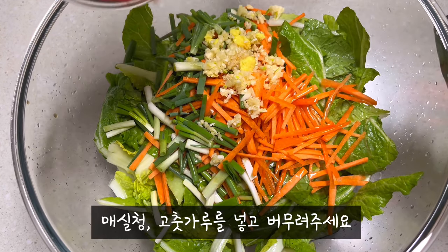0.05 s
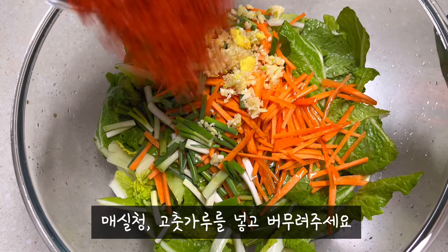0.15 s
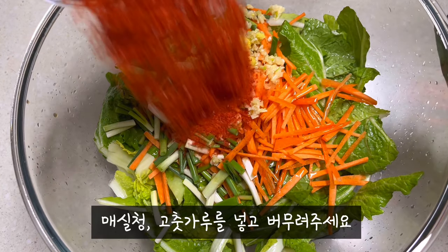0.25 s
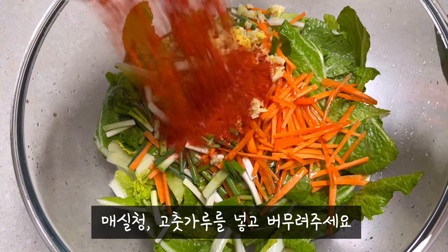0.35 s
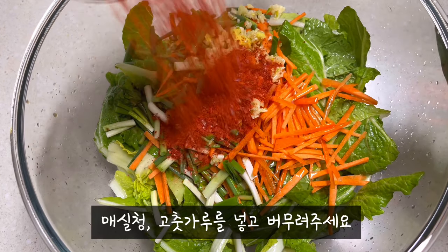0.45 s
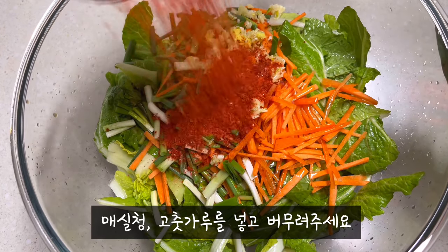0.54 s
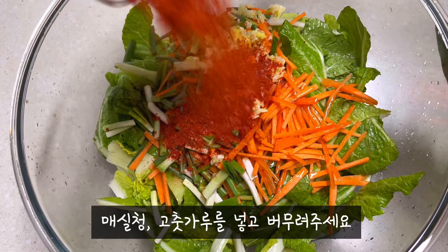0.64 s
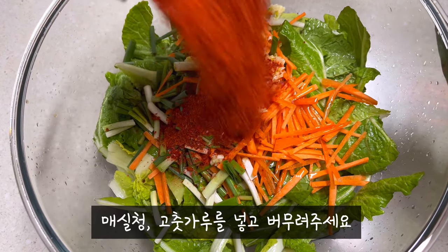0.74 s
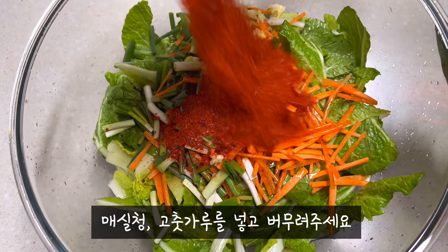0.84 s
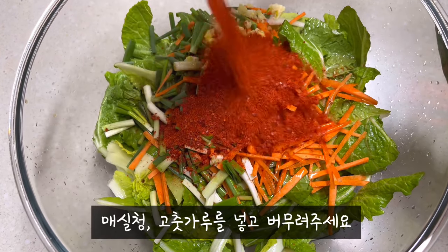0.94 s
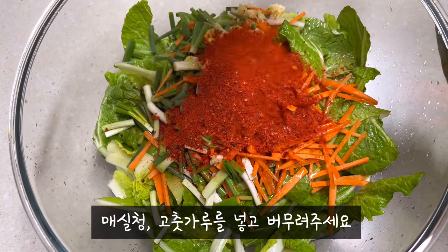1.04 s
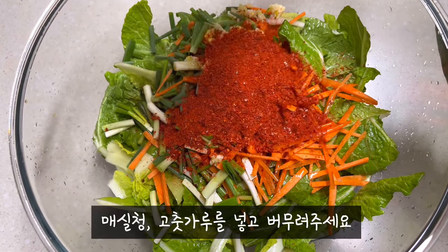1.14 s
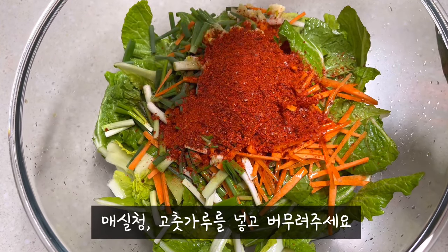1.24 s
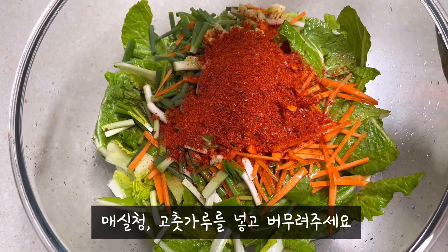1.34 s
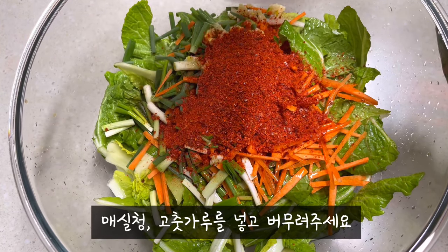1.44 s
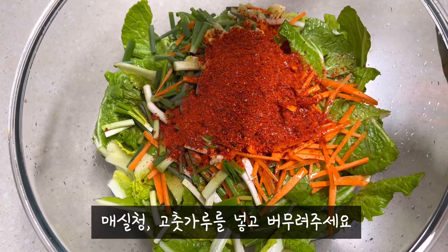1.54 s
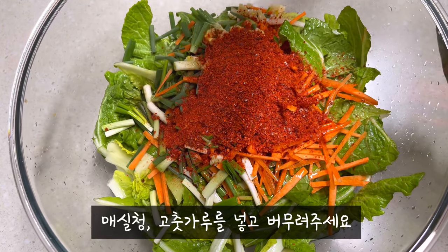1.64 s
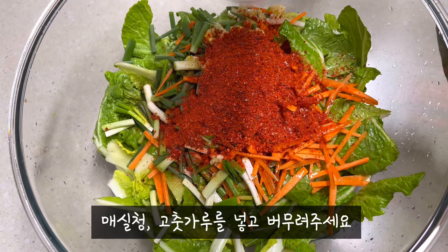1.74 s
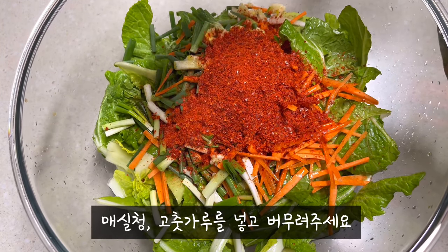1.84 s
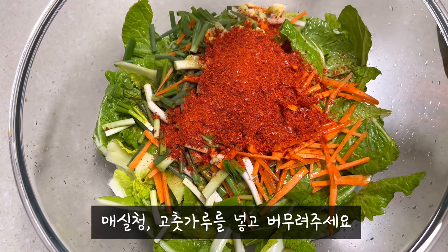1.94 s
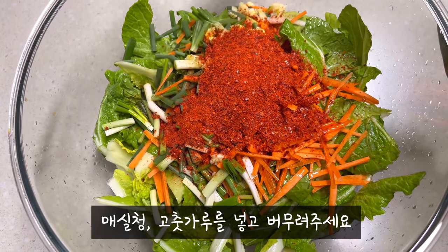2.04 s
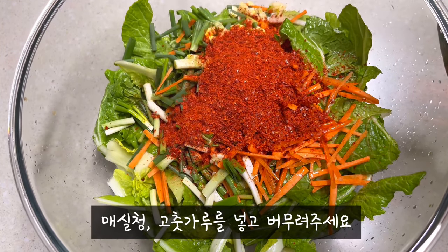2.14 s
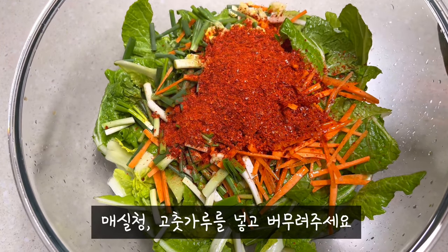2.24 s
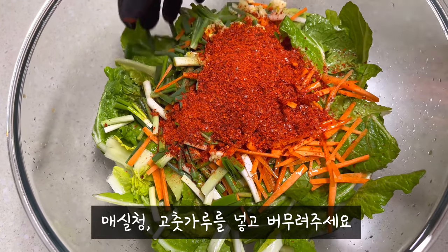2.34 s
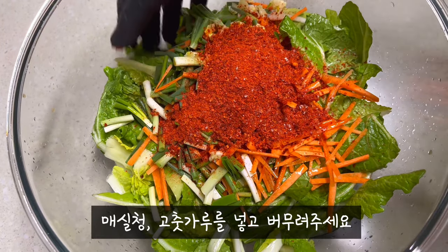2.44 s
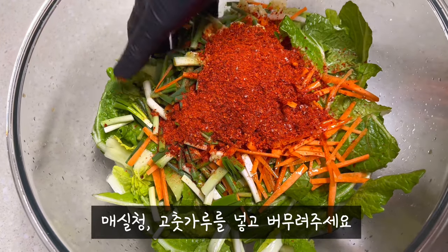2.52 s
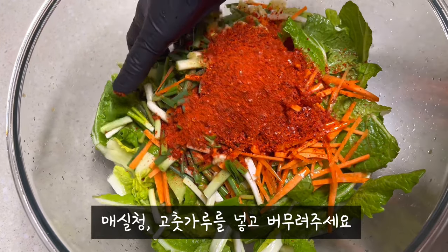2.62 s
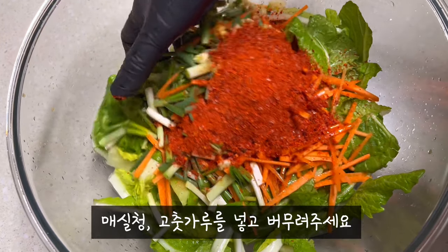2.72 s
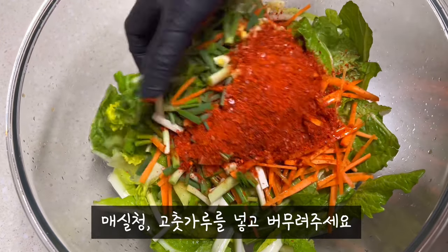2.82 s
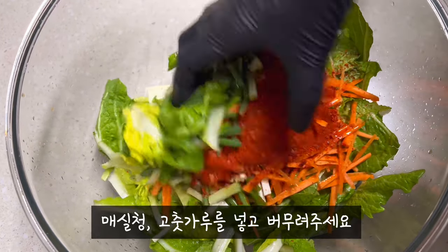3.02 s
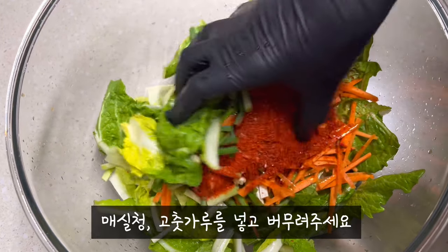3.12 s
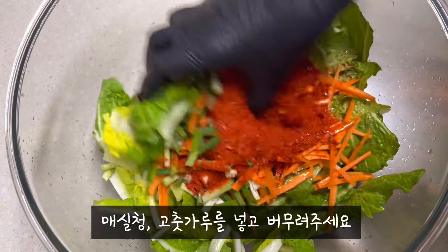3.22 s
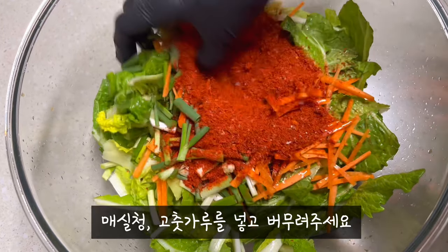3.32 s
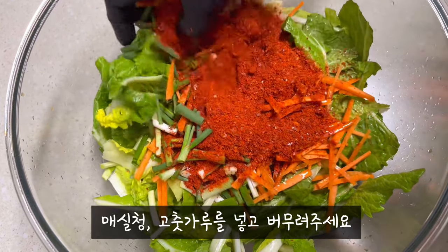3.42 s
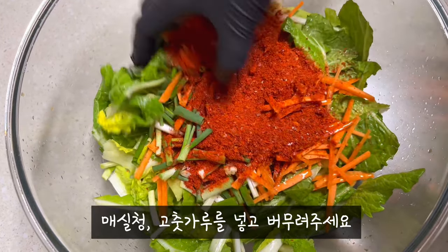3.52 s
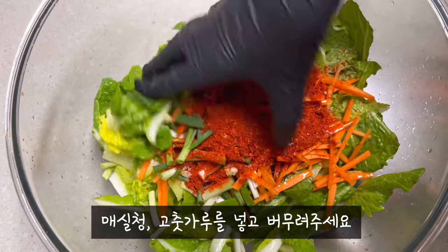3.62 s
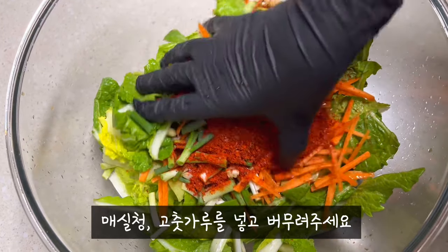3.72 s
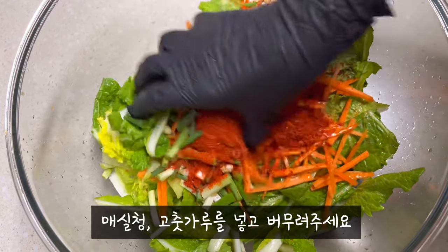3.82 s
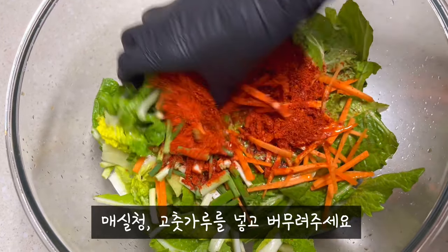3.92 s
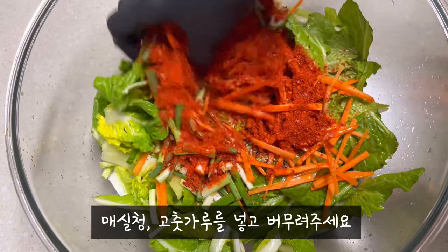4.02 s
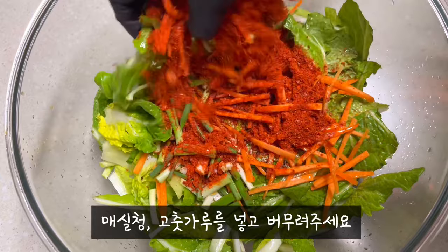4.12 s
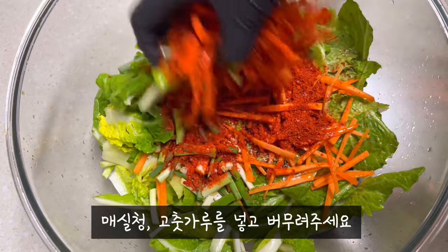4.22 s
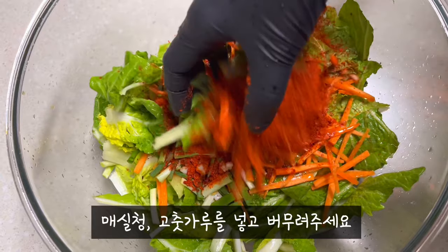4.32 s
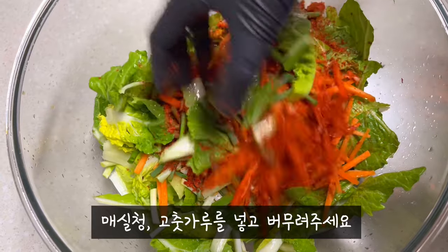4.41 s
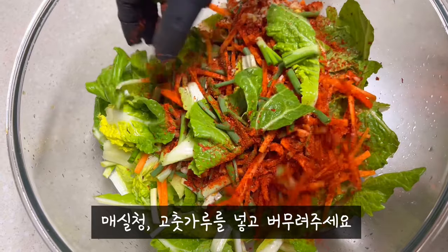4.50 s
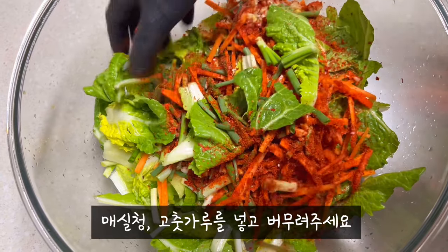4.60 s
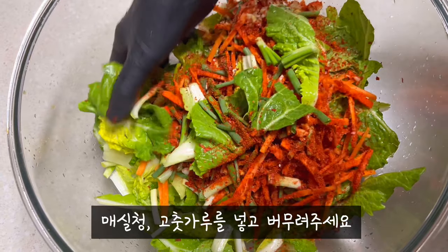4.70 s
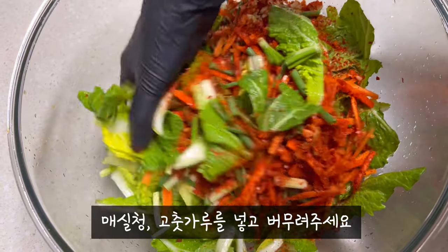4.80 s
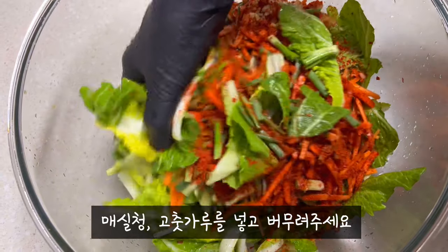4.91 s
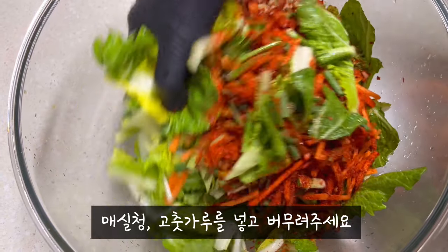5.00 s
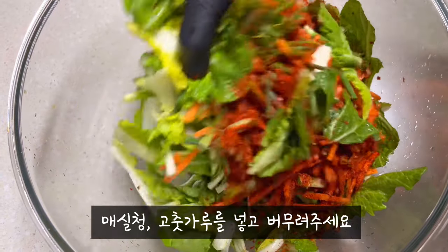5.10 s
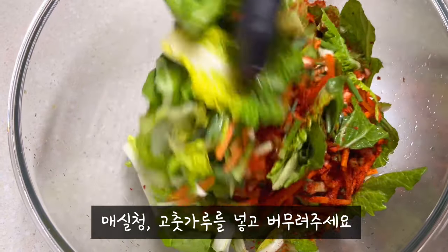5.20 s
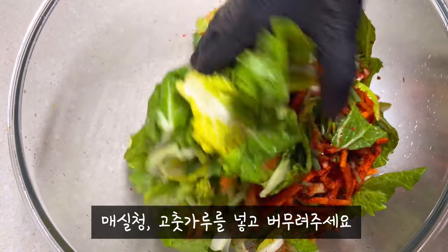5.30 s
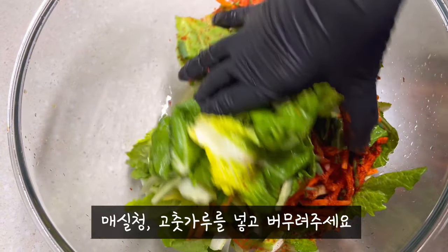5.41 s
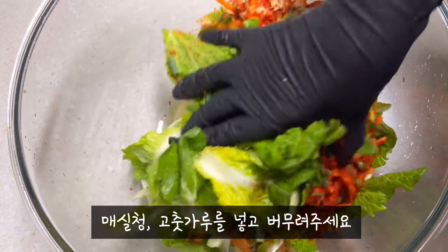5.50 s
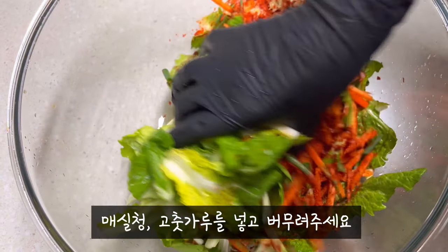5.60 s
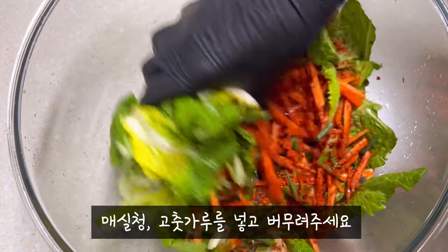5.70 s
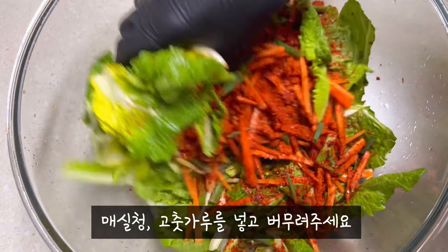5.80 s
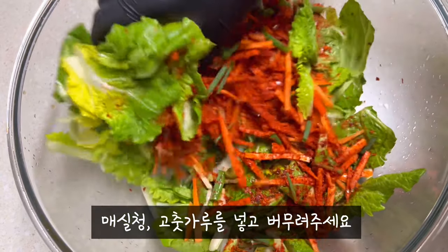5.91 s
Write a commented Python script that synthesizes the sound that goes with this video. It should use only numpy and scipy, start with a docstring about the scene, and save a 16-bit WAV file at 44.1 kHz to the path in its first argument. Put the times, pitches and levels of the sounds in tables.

```python
"""A quiet kitchen, close to a glass bowl of cut cabbage on the counter, heard by a pair of microphone ports.
Chili flakes are poured in two shakes: dense tiny noise bursts hiss, ring brightly and patter in clumps.
Then a gloved hand tosses and squeezes the leaves: noise grains give hollow rubs, crunch and wet crackle,
short noise bursts give single ticks and snaps, and chattering resonances give scrapes and creaks.
Sums of dying sines make the soft thuds of the bowl on the counter and the faint ring of the glass."""
import sys
import numpy as np
from scipy import signal
from scipy.fft import rfft, irfft, next_fast_len
from scipy.io import wavfile
from scipy.ndimage import uniform_filter1d

SR = 44100
rng = np.random.default_rng(int(sys.argv[2]) if len(sys.argv) > 2 else 0)


def waveform_to_disk(signal):
    """Save audio, clipped to [-1, 1], as 16-bit WAV at the path in sys.argv[1]."""
    frames = np.transpose(np.atleast_2d(signal))
    scaled = np.clip(frames, -1, 1) * 32767
    samples = np.round(scaled).astype(np.int16)
    wavfile.write(sys.argv[1], SR, samples)


N = 262395
TIME = np.arange(N) / SR

# colour of the hollow sound in the bowl under the hand: f/Hz, relative level per Hz/dB
HOLLOW = [(100, -22), (480, -3.5), (780, 7.5), (950, 6), (1150, 2), (1400, -4.5), (2000, -6.5), (4000, -34)]
# colour of the crisp crunch: f/Hz, relative level per Hz/dB
CRUNCH = [(150, -27), (500, -11), (900, -11), (1400, -12.5), (2000, -3), (3600, 0.5), (5600, -8.5),
          (7000, -11.5), (16000, -33.5)]
# colour of the fine wet crackle: f/Hz, relative level per Hz/dB
CRACKLE = [(1000, -52.5), (4000, 2), (6000, 0), (7500, 2.5), (9000, -1), (10500, -4.5), (13000, -6),
           (16000, -10)]


def amp(db):
    """Decibels to gain."""
    return 10 ** (np.asarray(db) / 20)


def evened(x):
    """Scales to an rms of one."""
    return x / np.sqrt(np.mean(x ** 2) + 1e-20)


def read(points, hz):
    """Reads a table on a log-frequency axis."""
    f, value = np.transpose(points)
    return np.interp(np.log(hz + 1), np.log(f + 1), value)


def add(mix, s, sound):
    """Mixes a two-channel sound in at time s."""
    part = mix[:, round(s * SR):][:, :sound.shape[1]]
    part += sound[:, :part.shape[1]]


def coloured(x, spectrum, size=4096):
    """Causal minimum-phase filter with the given spectrum, so that clicks keep their sharp front."""
    hz = abs(np.fft.fftfreq(size, 1 / SR))
    log_gain = np.log(amp(read(spectrum, hz)))
    minimum_phase = np.exp(np.conj(signal.hilbert(log_gain)))
    taps = np.fft.ifft(minimum_phase).real
    return signal.oaconvolve(x, taps[None, :size // 2], axes=1)[:, :x.shape[1]]


def wander(per_s):
    """Smooth chance: straight lines between random knots of unit spread."""
    knots = rng.standard_normal(N)
    return np.interp(TIME * per_s, np.arange(N), knots)


def background():
    """Still room air is steady coloured noise; a low rumble swells and sinks in lumps."""
    # room air: f/Hz, relative level per Hz/dB
    air_colour = [(20, -20), (55, 2.5), (200, -7), (265, 1.5), (330, -13.5), (800, -12.5), (1400, -25),
                  (8000, -32), (16000, -37)]
    # low rumble: f/Hz, relative level per Hz/dB
    rumble_colour = [(20, -16), (58, 3), (190, -14.5), (270, -5), (400, -26.5), (1000, -56.5)]
    # course of the rumble: t/s, level/dB
    rumble_course = [(0, -100), (1.3, -66.5), (1.8, -65.5), (2.6, -67.5), (2.9, -77), (5.1, -69.5),
                     (5.9, -73)]
    air = evened(coloured(rng.standard_normal((2, N)), air_colour))
    lumps = amp(3.0 * wander(per_s=22))
    rumble = evened(coloured(rng.standard_normal((2, N)), rumble_colour) * lumps)
    return amp(-72.5) * air + rumble * amp(np.interp(TIME, *np.transpose(rumble_course)))


def burst(decay_s, scatter_db, scatter_s, size=2048):
    """One tiny fracture and its scatter round the bowl: noise with a fast and a slow decay at each port."""
    t = np.arange(size) / SR
    decay = np.exp(-t / decay_s) + amp(scatter_db) * np.exp(-t / scatter_s)
    return rng.standard_normal((2, size)) * decay


def grains(per_s, spread_db, decay_s, spots, count=256):
    """Fractures of very unequal size, from a limited set of spots that soon give way to others."""
    size = amp(spread_db * np.minimum(rng.exponential(1, N), 5))
    # the set moves on by one spot 40 times a second; each spot has its own burst
    first_spot = (TIME * 40).astype(int)
    spot = (first_spot + (spots * rng.random(N)).astype(int)) % count
    shapes = [evened(burst(decay_s, scatter_db=-15.5, scatter_s=0.018, size=1024)) for _ in range(count)]
    out = np.zeros((2, N))
    for i in np.flatnonzero(rng.random(N) < per_s / SR):
        add(out, TIME[i], size[i] * shapes[spot[i]])
    return out


def played(x, times, level_db, size=1500):
    """Makes a texture follow a level curve while its fine grain stays."""
    power = uniform_filter1d(uniform_filter1d((x ** 2).mean(0), size), size)
    level = amp(np.interp(TIME, times, level_db, left=-140, right=-140))
    return x / np.sqrt(abs(power) + 1e-20) * level


def shifting(x, depth_db, size=512):
    """Patches of colour come and go: a smooth random gain over time and frequency."""
    overlap = size * 3 // 4
    z = signal.stft(x, nperseg=size, noverlap=overlap)[2]
    patches = rng.standard_normal(z.shape[1:])
    for _ in range(2):
        patches = uniform_filter1d(patches, size=4, axis=0)
        patches = uniform_filter1d(patches, size=14, axis=1)
    return signal.istft(z * amp(depth_db * evened(patches)), nperseg=size, noverlap=overlap)[1][:, :N]


def tear(length, spectrum, size=2048):
    """A short noise burst with an rms of one over its length in s; no two have quite the same colour."""
    t = np.arange(size) / SR
    tearing = np.exp(-(t / length) ** 2) + amp(-19) * np.exp(-t / .009)
    colour = [(hz, db + 2.5 * rng.standard_normal()) for hz, db in spectrum]
    sound = coloured(tearing * rng.standard_normal((2, size)), colour)
    return evened(sound) * np.sqrt(length * SR / size)


def flakes(ring_hz=7300, sharpness=9, ring_db=-2):
    """Light flakes hiss down, ring brightly where they fall thickest, and patter on the leaves in clumps."""
    # flow of flakes, one curve for each shake: t/s, relative level/dB
    shakes = [
        [(0.197, -76), (0.214, -50.5), (0.228, -45), (0.308, -55), (0.338, -56.5), (0.352, -50), (0.408, -63),
         (0.66, -72.5)],
        [(0.66, -73.5), (0.764, -63), (0.79, -58.5), (1.09, -66.5), (1.192, -84.5), (1.2, -75), (1.216, -87),
         (1.24, -101)],
    ]
    # dull patter against the flow, one for each shake; the second lands on the heap: level/dB
    patter_levels = [-23, -5.5]
    # clumps that land with a tick of their own: t/s, bright tick level/dB, dull pat level/dB
    ticks = [(0.194, -58, -86), (0.521, -60, -73), (0.593, -75, -70), (0.769, -47, -84), (0.91, -63, -61.5)]
    # fine flakes: f/Hz, relative level per Hz/dB
    hiss_colour = [(1000, -39), (1900, -23), (3200, -8), (5000, -6), (6300, -7.5), (7100, 0.5), (8000, -2),
                   (9500, -5.5), (16000, -8)]
    # clumps: f/Hz, relative level per Hz/dB
    patter_colour = [(100, -34), (350, -5), (750, 11), (1400, -2.5), (2000, 6.5), (2800, 9.5), (8000, -30)]
    patter_lag_s = 0.052  # clumps trail the fine dust

    hiss = coloured(grains(per_s=2600, spread_db=3.7, decay_s=0.0004, spots=150), hiss_colour)
    hiss = shifting(hiss, depth_db=1.3)
    patter = coloured(grains(per_s=550, spread_db=2.0, decay_s=0.0034, spots=150), patter_colour)
    bright = signal.lfilter(*signal.iirpeak(ring_hz, sharpness, SR), rng.standard_normal((2, N)))
    thickest_db = max(db for shake in shakes for s, db in shake)
    out = np.zeros((2, N))
    for shake, patter_db in zip(shakes, patter_levels):
        s, flow_db = np.transpose(shake)
        out += played(hiss, s, flow_db + 3.5)
        out += played(patter, s + patter_lag_s, flow_db + patter_db)
        # the ring follows the flow more steeply than the hiss
        out += played(bright, s, flow_db + ring_db + 0.51 * (flow_db - thickest_db))
    for s, tick_db, pat_db in ticks:
        add(out, s, amp(tick_db) * tear(0.0018, hiss_colour) + amp(pat_db) * tear(0.0067, patter_colour))
    return out


def ring(modes, size=22050):
    """A struck object: a sum of dying sines."""
    t = np.arange(size) / SR
    return sum(amp(db - 60 * t / t60) * np.sin(2 * np.pi * hz * t) for hz, db, t60 in modes)


def glass(x, coupling_db=-53):
    """The bowl rings faintly with whatever moves in it: convolution with its dying modes."""
    # the glass, damped by its load: f/Hz, relative level/dB, t60/s
    glass_modes = [(510.4, 6.5, 0.072), (624, -8.5, 0.11), (1496, 2.5, 0.2), (1686, 4, 0.047),
                   (2314, -24.5, 0.18)]
    return amp(coupling_db) * signal.oaconvolve(x, ring(glass_modes)[None], axes=1)[:, :N]


def kitchen(x, t60=0.12, wet_db=-14, size=22050):
    """A short, diffuse tail from the hard walls: decaying noise after a 5 ms gap."""
    t = np.arange(size) / SR
    tail = rng.standard_normal((2, size)) * amp(-60 * t / t60) * (t > .005)
    return amp(wet_db) * signal.oaconvolve(x, tail / np.linalg.norm(tail[0]), axes=1)[:, :N]


def cupped(x, steepness=10, size=512):
    """The hollow under the hand cuts steeply below a pitch that moves as the hand opens and closes."""
    # the hollow changes its size: t/s, lowest pitch f/Hz
    cup = [(2.5, 455), (3, 700), (3.4, 703), (3.85, 480), (4.1, 634), (4.7, 495), (5.2, 490), (5.5, 790),
           (5.8, 466)]
    hz, t, z = signal.stft(x, SR, nperseg=size)
    above = (hz[:, None] / np.interp(t, *np.transpose(cup))) ** steepness
    return signal.istft(z * np.sqrt(above / (1 + above)), nperseg=size)[1][:, :N]


def snaps(crack_s=0.0033, knock_s=0.0051):
    """Single ticks and snaps: each a short crisp noise burst and a longer, hollow one."""
    # a leaf or stalk breaks or settles, or the bowl clicks as it bumps:
    # t/s, crunch level/dB, hollow knock level/dB, wet crackle level/dB
    single_ticks = [(1.247, -76, -68, -78), (1.675, -90, -90, -70), (1.888, -74, -75, -70),
                    (1.901, -64, -82, -59), (2.383, -48.5, -77, -63), (2.4035, -47.5, -72, -53),
                    (2.5, -44, -35, -66), (2.514, -55, -47, -66), (2.563, -43, -48, -64),
                    (2.579, -39, -41, -62), (2.598, -40.5, -54, -53), (2.624, -39.5, -50, -48),
                    (2.629, -37.5, -35.5, -58), (2.668, -61, -42.5, -60), (2.685, -48, -39.5, -49),
                    (2.717, -50, -45, -60), (2.785, -41.5, -58, -59), (2.802, -48, -48, -50),
                    (2.853, -61, -43.5, -53), (2.88, -56, -48, -70), (2.897, -52, -49, -48),
                    (2.913, -42, -49, -48), (2.931, -47, -46, -57), (2.97, -61, -47, -51),
                    (3.003, -44.5, -39, -49), (3.047, -45.5, -45, -63), (3.09, -45, -39.5, -50),
                    (3.128, -49, -49, -56), (3.279, -58, -40.5, -58), (3.292, -53, -44.5, -60),
                    (3.519, -54, -62, -50), (3.732, -55, -61, -77), (3.754, -65, -60, -45),
                    (3.819, -56, -42, -42), (3.851, -62, -35.5, -63), (3.912, -61, -59, -40),
                    (3.963, -45, -54, -60), (4.19, -67, -64, -57), (4.201, -60, -67, -51.5),
                    (4.229, -58, -66, -58), (4.34, -65, -55.5, -58), (4.574, -50, -61, -56),
                    (4.84, -46.5, -42.5, -61), (5.017, -40, -41, -61), (5.081, -46, -41.5, -68),
                    (5.338, -45, -57, -53), (5.377, -42, -48, -46), (5.394, -49, -45, -60),
                    (5.439, -39, -48, -53), (5.457, -45, -50, -65), (5.556, -44, -56, -53),
                    (5.576, -40.5, -50, -58), (5.807, -48.5, -57, -70), (5.843, -45, -48, -51)]
    cracks, knocks = np.zeros((2, 2, N))
    for s, crunch_db, knock_db, crackle_db in single_ticks:
        add(cracks, s, amp(crunch_db) * tear(crack_s, CRUNCH) + amp(crackle_db) * tear(crack_s, CRACKLE))
        add(knocks, s, amp(knock_db) * tear(knock_s, HOLLOW))
    return cracks + cupped(knocks)


def resonate(x, hz, width_hz):
    """A resonance of gain one that follows a pitch curve: shift to 0 Hz, smooth, shift back."""
    turn = np.exp(2j * np.pi * np.cumsum(hz) / SR)
    r = np.exp(-np.pi * width_hz / SR)
    return 2 * (turn * signal.lfilter([1 - r], [1, -r], x / turn + 1e-18)).real


def scrape(length, hz, sharpness, slips_per_s=4400, slide=0.55):
    """A chatter of tiny slips keeps one resonance sounding; its pitch falls as the leaf bends."""
    u = np.arange(0, 1, 1 / (length * SR))  # share of the stroke done
    slips = rng.standard_normal((2, len(u))) * (rng.random(len(u)) < slips_per_s / SR)
    chatter = slips + 0.011 * rng.standard_normal(len(u))
    # slide is the fall over the stroke, as a share of hz / sharpness
    pitch = hz * (1 + slide / sharpness * (.5 - u))
    width_hz = 2 * hz / sharpness  # each of two passes is wide
    sound = resonate(resonate(chatter, pitch, width_hz), pitch, width_hz)
    return evened(sound * np.sin(np.pi * u) ** .5)


def scrapes():
    """The longer scrapes and squeaks: a leaf or the glove sticks and slips on one resonance."""
    # strokes: t/s, length/s, f/Hz, sharpness (no unit), level/dB
    strokes = [(1.305, 0.045, 1490, 0.8, -72), (1.324, 0.013, 2040, 3, -70),
               (1.853, 0.094, 8750, 2.3, -76.5), (2.299, 0.15, 2480, 7, -66.5),
               (2.381, 0.015, 7050, 7.7, -50.5), (2.485, 0.08, 600, 6.4, -47.5),
               (3.188, 0.05, 3700, 4.5, -46), (3.223, 0.03, 8100, 4.6, -49), (4.367, 0.16, 2960, 19, -61),
               (4.406, 0.013, 2900, 32, -56), (4.452, 0.014, 2990, 21, -52.5),
               (4.652, 0.011, 4040, 6.1, -47), (4.677, 0.02, 1760, 3.8, -45.5),
               (4.687, 0.014, 870, 12, -39.5), (4.948, 0.016, 2050, 8.1, -47),
               (5.109, 0.016, 1020, 14, -51), (5.748, 0.074, 517, 7.2, -61)]
    out = np.zeros((2, N))
    for s, length, hz, sharpness, db in strokes:
        add(out, s, amp(db) * scrape(length, hz, sharpness))
    return out


def bumps(push_s=0.0053):
    """The bowl rocks and lands softly; the counter booms, a sum of modes with a softened front."""
    # soft thuds as the bowl shifts or bumps on the counter: t/s, peak level/dB
    thuds = [(1.364, -61), (1.726, -53.5), (2.022, -51.5), (4.583, -39), (4.607, -36), (4.728, -37.5),
             (4.845, -52)]
    # the counter under the bowl: f/Hz, relative level/dB, t60/s
    counter_modes = [(70.2, 14.5, 0.16), (104, 3, 0.26), (362, -6, 0.076)]
    boom = ring(counter_modes)
    boom = boom * (1 - np.exp(-np.arange(len(boom)) / SR / push_s))
    out = np.zeros((2, N))
    for s, db in thuds:
        add(out, s, amp(db) * np.array([boom, boom]) / abs(boom).max())
    return out


def squeezing(swell_db=10, rub_law=1.49, roundness=1.38, touch_s=2.289):
    """Levels in dB of rub, crunch and crackle: each squeeze swells over its rise and fades over its release."""
    # squeezes and lifts of the hand: firmest moment t/s, rise/s, release/s, relative crunch level/dB,
    # hollow rub against the crunch/dB, wet crackle against the crunch/dB (before the trims in leaves)
    squeezes = [(2.325, 0.04, 0.058, -71.5, 4.5, -3.5), (2.521, 0.079, 0.13, -47, 4, -18.5),
                (2.649, 0.04, 0.22, -47.5, 2.5, -14), (2.77, 0.083, 0.072, -55.5, 4, -2.5),
                (3.05, 0.32, 0.27, -53.5, 2.5, -8), (3.255, 0.16, 0.21, -52, 3, -3),
                (3.599, 0.066, 0.32, -56, -4, -5), (3.842, 0.12, 0.2, -53.5, 5, -6.5),
                (3.941, 0.11, 0.084, -50, 2, -4), (4.075, 0.089, 0.06, -63, 4, 1.5),
                (4.26, 0.13, 0.2, -58.5, -9, -1.5), (4.409, 0.082, 0.15, -59, -12, 1.5),
                (4.68, 0.065, 0.087, -50.5, -5.5, -12), (4.804, 0.097, 0.095, -44, 0.5, -18),
                (4.925, 0.053, 0.11, -44.5, 2, -12), (5.19, 0.42, 0.3, -51.5, -0.5, -7),
                (5.45, 0.2, 0.1, -50, 2.5, -11), (5.665, 0.2, 0.19, -46.5, 2, -11),
                (5.85, 0.074, 0.32, -53, 5, -15)]
    s, rise, release, crunch_db, hollow_db, wet_db = np.transpose(squeezes)[:, :, None]
    t = TIME[::64]
    # a roundness above 1 gives a rounder top and steeper ends
    grip = -swell_db * np.maximum((s - t) / rise, (t - s) / release) ** roundness
    # the rub follows the grip more steeply than the other two
    rub = crunch_db + hollow_db + rub_law * grip
    crunch = crunch_db + grip
    crackle = crunch_db + wet_db + grip
    touching = t > touch_s  # the glove first meets the leaves
    levels = []
    for db in (rub, crunch, crackle):
        power = (amp(db) ** 2).sum(0) * touching
        levels.append(np.interp(TIME, t, 10 * np.log10(power + 1e-14)))
    return levels


def jerks(per_s, decay_s, steady):
    """Force on the leaves: it jumps at each slip and dies away, over a steady share."""
    kicks = (rng.random(N) < per_s / SR) * rng.uniform(.4, 1, N)
    return steady + signal.lfilter([1], [1, -np.exp(-1 / (decay_s * SR))], kicks)


def creaks(low_hz=1550, high_hz=4800, length_s=0.022, sharpness=22, range_db=10, count=2600):
    """Single stalks rub past each other for a moment, each with its own pitch, length and strength."""
    out = np.zeros((2, N))
    for when, pitch, length, strength in rng.random((count, 4)):
        hz = low_hz * (high_hz / low_hz) ** pitch
        creak = scrape(length_s * (.5 + length), hz, sharpness)
        add(out, when * N / SR, amp(range_db * strength) * creak)
    return evened(out)


def leaves(rub_db, crunch_db, crackle_db, creak_db=-6):
    """Leaves slip in jerks under the glove: hollow under the cupped hand, crisp above it, with wet ticks."""
    force = jerks(per_s=140, decay_s=.005, steady=1.2)
    slips = force * grains(per_s=1600, spread_db=3.2, decay_s=.0004, spots=3)
    rub_force = jerks(per_s=160, decay_s=0.016, steady=1.0)
    rubs = rub_force * grains(per_s=800, spread_db=1.5, decay_s=0.0013, spots=4)
    # wet films part with very short ticks
    films = grains(per_s=1500, spread_db=4.2, decay_s=.00025, spots=3)
    hollow = coloured(evened(rubs) + 0.49 * evened(slips), HOLLOW)
    hollow = cupped(shifting(hollow, depth_db=2.5))
    crunch = shifting(coloured(slips, CRUNCH), depth_db=2.7)
    crackle = shifting(coloured(evened(films) + .5 * evened(slips), CRACKLE), depth_db=3)
    out = played(hollow, TIME, rub_db) + played(crunch, TIME, crunch_db + 0.62)
    out += creaks() * amp(crunch_db + creak_db)
    return out + played(crackle, TIME, crackle_db + 6.0)


def scene():
    """Everything in the bowl with its glass and the room, the counter and the background."""
    hand = squeezing()
    bowl = flakes() + leaves(*hand) + snaps() + scrapes()
    bowl = bowl + glass(bowl)
    return bowl + kitchen(bowl) + bumps() + background()


def record(dry, size=4096):
    """The two ports share part of the sound, with a phase and balance that turn with pitch; then band limits."""
    # likeness of the two ports, held within 0 to 1: f/Hz, likeness (no unit)
    likeness = [(300, 0.92), (1100, 0.87), (1500, -0.16), (2000, 0.85), (3200, 0.02), (5500, 0.44),
                (6500, 0.82), (7500, 0.86), (9200, 1), (11000, 0.35), (14000, 2)]
    # phase by which the left port leads: f/Hz, phase/rad
    lead = [(100, .1), (550, .5), (900, -.15), (2000, -.1), (2700, 1.4), (3700, -.8), (5100, .5),
            (5800, -3), (6600, -3.2), (8400, -6.28), (10200, -6.3), (11800, -9.4), (13700, -9.5),
            (15200, -12.5)]
    # balance, left minus right: f/Hz, level/dB
    tilt = [(100, 2), (350, -2), (600, 6.5), (950, 2), (3400, 1.5), (4700, 0)]
    length = next_fast_len(N + size)
    hz = np.fft.rfftfreq(length, 1 / SR)
    left, other = rfft(dry, length)
    same = np.clip(read(likeness, hz), 0, 1)
    right = same * left + np.sqrt(1 - same ** 2) * other
    right = right * np.exp(-1j * read(lead, hz))
    lean = amp(read(tilt, hz) / 2)
    ports = irfft(np.array([left * lean, right / lean]), length)[:, :N]
    ports = signal.lfilter(*signal.butter(2, 48, "highpass", fs=SR), ports)
    high_cut = signal.firwin(511, 15900, window=("kaiser", 9), fs=SR)
    return signal.oaconvolve(ports, high_cut[None], "same")


dry = scene()
out = record(dry)
waveform_to_disk(out)
```